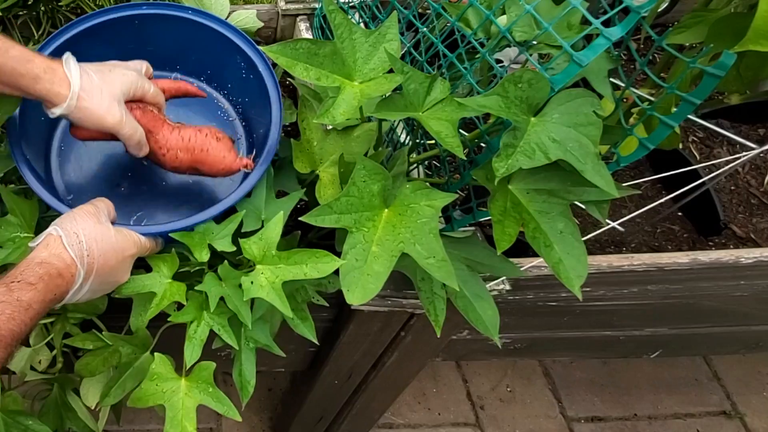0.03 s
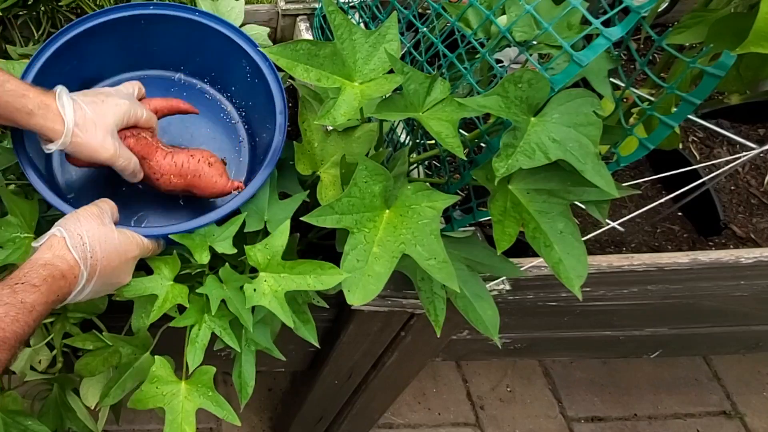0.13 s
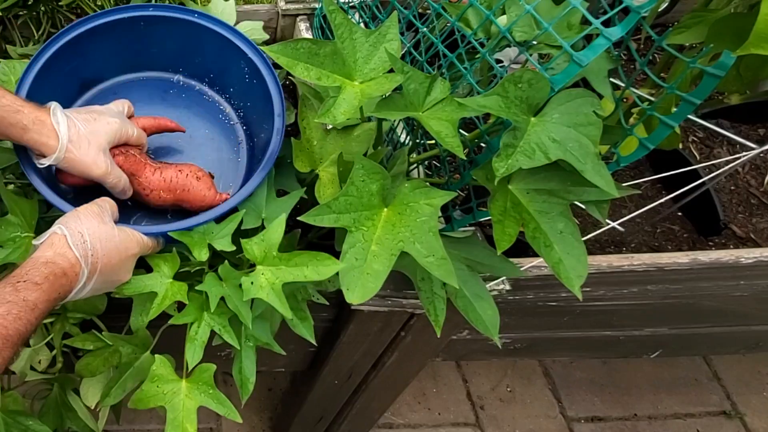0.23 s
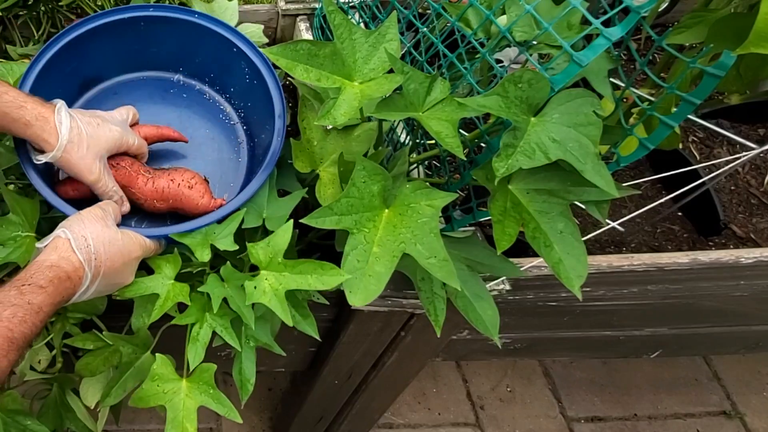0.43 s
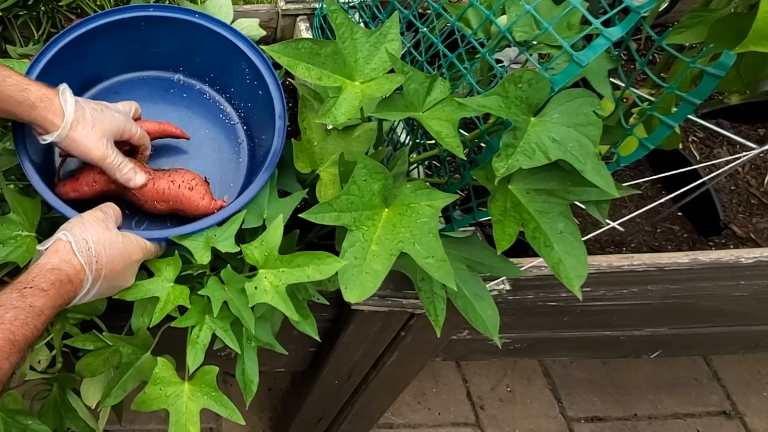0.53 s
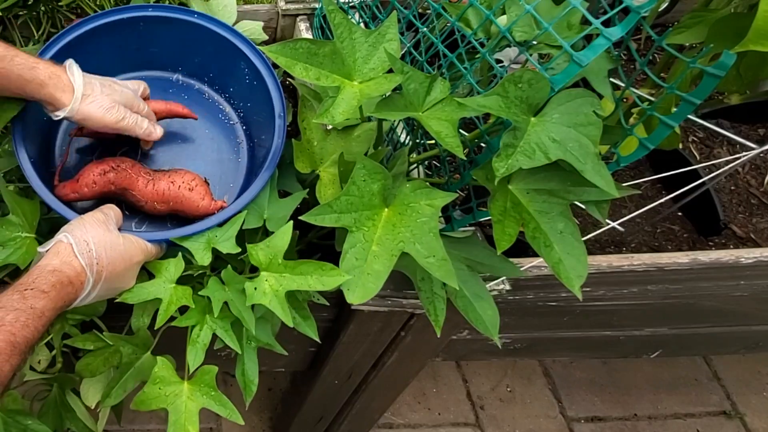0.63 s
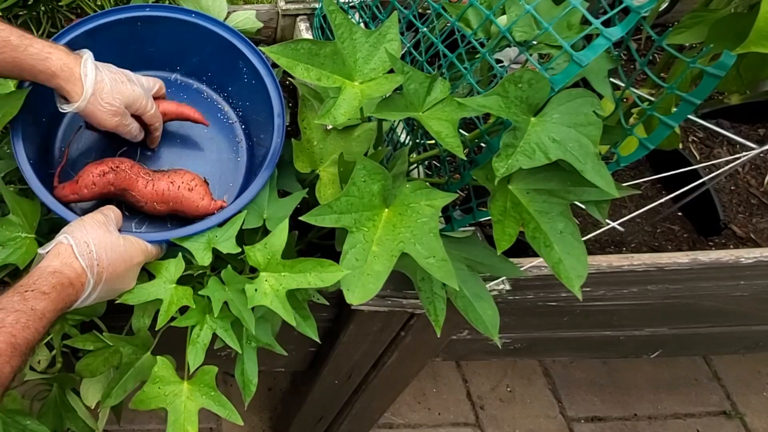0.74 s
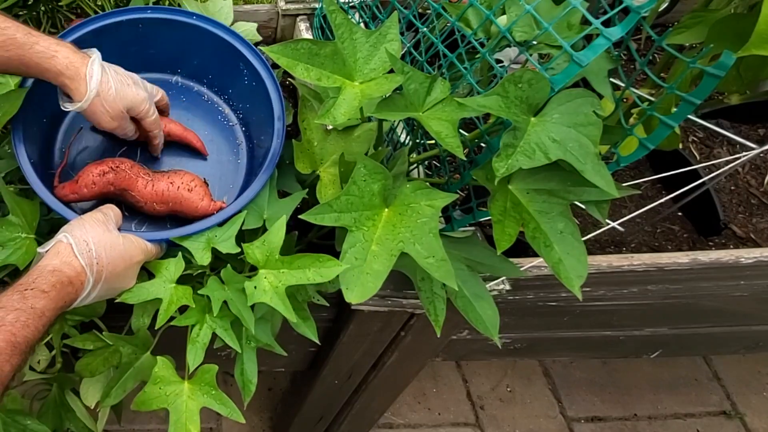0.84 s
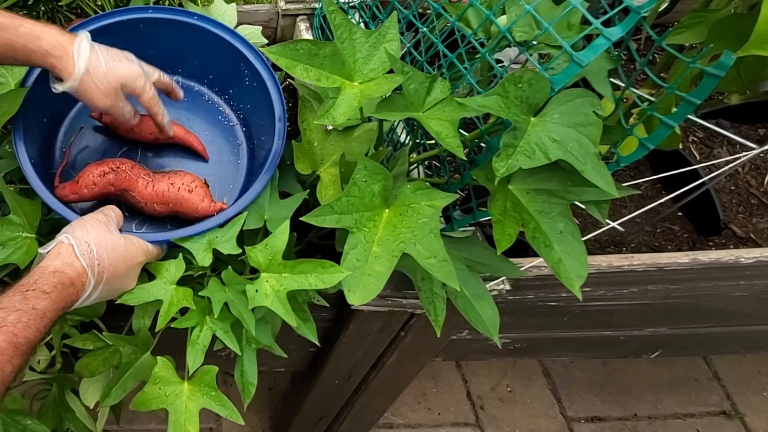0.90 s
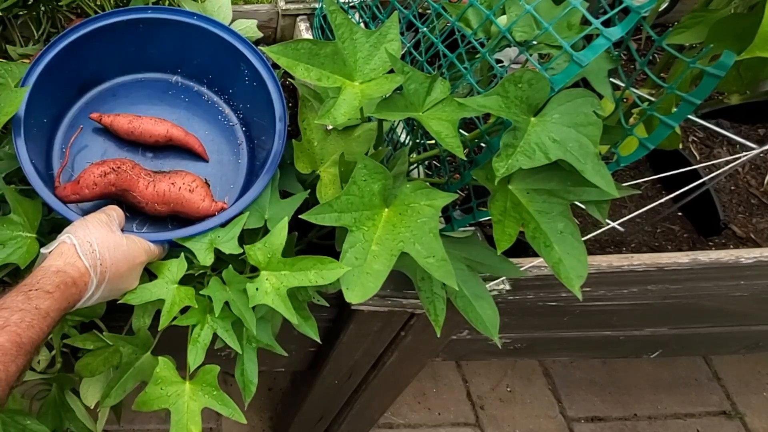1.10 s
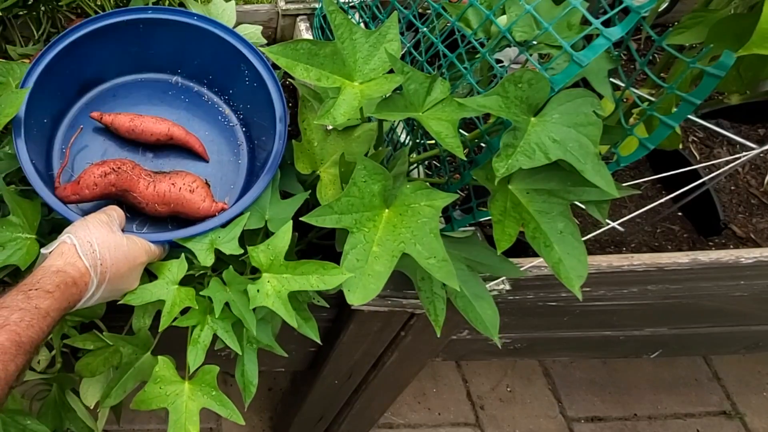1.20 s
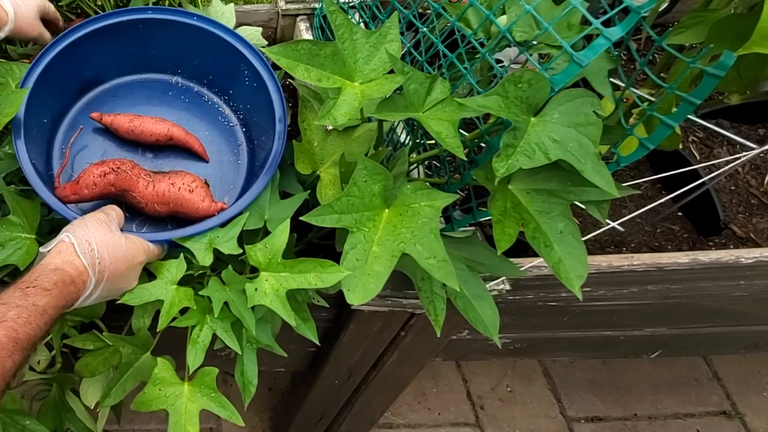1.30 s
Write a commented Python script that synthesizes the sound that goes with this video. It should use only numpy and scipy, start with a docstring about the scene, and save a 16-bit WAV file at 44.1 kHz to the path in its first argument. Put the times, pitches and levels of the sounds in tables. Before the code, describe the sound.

Two sweet potatoes knock into a plastic tub close by. After soft handling bumps, the first lands with a sharp, hollow knock at about 0.2 seconds. A glove rustles faintly around 0.6 and 0.8 seconds. The second lands near 0.8 seconds, bouncing and rocking to rest by 1 second. Soft tub thuds come and go, while insects chirp and buzz faintly on the right over quiet garden air.

```python
"""Sweet potatoes in a plastic tub

Two sweet potatoes are set down in a hand-held tub in a garden, each impact exciting its damped modes.
The big one lands with a knock; the small one is let go, bounces and rocks to rest.
The tub bumps softly in the hand, a glove rustles by friction, and insects chirp and buzz
faintly to the right over quiet outdoor air."""
import sys
import numpy as np
from scipy import signal
from scipy.fft import rfft, irfft
from scipy.io import wavfile

SR = 44100
rng = np.random.default_rng(int(sys.argv[2]) if len(sys.argv) > 2 else 0)


def dump(signal):
    """Clip the signal to [-1, 1] and save it as 16-bit WAV at the path in sys.argv[1]."""
    limited = np.clip(np.atleast_2d(signal).T, -1, 1)
    pcm = np.round(limited * 32767).astype(np.int16)
    wavfile.write(sys.argv[1], SR, pcm)


N = 59535
TIME, FREQS = np.arange(N) / SR, np.maximum(np.arange(N // 2 + 1) * SR / N, 1)


def from_db(db):
    """Amplitude grows tenfold for every 20 decibels."""
    return 10 ** (np.asarray(db) / 20)


def at_hz(points):
    """Interpolation of (Hz, value) points along a logarithmic frequency axis."""
    hz, value = np.transpose(points)
    return np.interp(np.log(FREQS), np.log(hz), value)


def pan(db):
    """Direction by level difference: two gains with a mean of one, for a pan of left minus right in dB."""
    gains = from_db(np.array([np.atleast_1d(db), -np.atleast_1d(db)]) / 2)
    return gains / gains.mean(0)


def noise(gain, coherence, pan_db=0):
    """Spectrally shaped, partly coherent stereo noise; the mean of its channels has unit rms."""
    mid, side = rng.standard_normal((2, N))
    pair = np.sqrt(1 + coherence) * mid + np.sqrt(1 - coherence) * side * np.array([[1], [-1]])
    out = irfft(rfft(pair) * gain * pan(pan_db), N)
    return out / out.mean(0).std()


def band(hz, width_hz):
    """Gaussian passband around one frequency."""
    return np.exp(-.5 * ((FREQS - hz) / width_hz) ** 2)


def decay(start, t60, rise):
    """Exponential damping, 60 dB in t60 seconds, after a smooth onset."""
    age = np.maximum(TIME - start, 0)
    onset = 1 - np.exp(-np.minimum((age / rise) ** 2, 40))
    return onset * np.exp(-np.minimum(np.log(1000) * age / t60, 40))


def swell(start, length):
    """Gaussian envelope of a short stroke."""
    return np.exp(-np.minimum(6 * ((TIME - start) / length - .5) ** 2, 40))


def ring(start, hz, db, t60, rise):
    """A struck mode vibrates freely as a damped sinusoid."""
    return from_db(db) * decay(start, t60, rise) * np.sin(2 * np.pi * hz * (TIME - start))


def air():
    """Slowly modulated noise: garden ambience, and a rumble that comes and goes as things are moved."""
    # Each row: frequency in Hz, relative spectral density in dB.
    air_spectrum = [(20, -9.5), (85, -14), (170, -12), (280, -6), (420, -6.5), (700, -3), (950, -13),
                    (1200, -25.5), (1750, -9.5), (2200, -24), (2700, -32), (3400, -19.5), (4050, -13.5),
                    (4900, -38.5), (6600, -26), (7900, -40.5), (9000, -31.5), (10500, -44.5),
                    (16000, -41.5)]
    rumble_spectrum = [(20, -15), (50, -10), (85, -2.5), (170, 1), (260, -5), (400, -25), (1200, -52)]
    # Each row: time in seconds, level in dB.
    air_levels = [(0, -70.5), (.12, -65.5), (.39, -64.5), (.56, -64), (.68, -65.5), (.87, -62.5),
                  (1.06, -64), (1.19, -60), (1.35, -58.5)]
    rumble_levels = [(0, -65), (.19, -54.5), (.34, -50), (.38, -75.5), (.53, -63), (.62, -79.5),
                     (.74, -63.5), (.96, -50.5), (1.05, -62.5), (1.17, -61), (1.35, -58.5)]
    # Each row: frequency in Hz, pan in dB.
    air_pan = [(60, -4), (380, -2.5), (700, -7), (1300, -20), (2400, -13.5), (4200, -23.5), (5600, 1.5),
               (8100, -9), (15000, -11.5)]
    garden = noise(from_db(at_hz(air_spectrum)), 0.23, at_hz(air_pan))
    rumble = noise(from_db(at_hz(rumble_spectrum)), coherence=.7)
    garden_gain = from_db(np.interp(TIME, *np.transpose(air_levels)))
    rumble_gain = from_db(np.interp(TIME, *np.transpose(rumble_levels)))
    return garden_gain * garden + rumble_gain * rumble


def insects():
    """Narrow-band noise is heard as pitch: chirps and thin, high buzzes from the leaves on the right."""
    # Each row: start in seconds, length in seconds, level in dB, centre frequency in Hz.
    chirp_calls = [(0.0, 0.07, -65.5, 4084), (0.143, 0.031, -79, 7130), (0.32, 0.032, -85.5, 8700),
                   (0.613, 0.048, -69, 8670), (0.864, 0.073, -65, 8660), (1.032, 0.038, -64.5, 3930),
                   (1.126, 0.043, -64, 8690), (1.245, 0.032, -64.5, 3526)]
    # Each row: the same four columns, then the width of the band in Hz.
    buzz_calls = [(0.55, 0.079, -52.5, 16350, 311), (0.595, 0.051, -56.5, 15600, 342),
                  (0.56, .1, -75, 14000, 1360), (0.745, .035, -58.5, 14850, 550),
                  (0.755, 0.072, -68.5, 14640, 1050), (0.825, 0.055, -64, 14660, 1100)]
    chirps = sum(from_db(db) * swell(start, length) * noise(band(hz, width_hz=110), 1.0, pan_db=-36)
                 for start, length, db, hz in chirp_calls)
    buzzes = sum(from_db(db) * swell(start, length) * noise(band(hz, width_hz), .5, pan_db=-38)
                 for start, length, db, hz, width_hz in buzz_calls)
    return chirps + buzzes


def bumps(rise_s=0.0068, scrape_db=-9):
    """Soft contact excites low frequencies: the tub thuds in the hand, each time with a dull scrape."""
    # Each row: start in seconds, level in dB, frequency in Hz, pan in dB.
    contacts = [(0.003, -43, 110, 83), (0.025, -40, 165, 6), (0.041, -35, 115, 5), (0.077, -38.5, 94.6, 1),
                (0.127, -39, 95, 8), (0.155, -28.5, 170, 24.5), (0.191, -54.5, 82, -1.5),
                (0.314, -33, 86, 2.5), (0.445, -36, 109, 3.5), (0.458, -38, 172.1, 2),
                (0.476, -48, 80.3, 20), (0.54, -52.5, 90, 5.5), (0.69, -52.5, 170, -10.5),
                (0.743, -40, 130, -4), (1.12, -46.5, 98, -6.5), (1.203, -42.5, 90, -6),
                (1.328, -53, 140, -4)]
    # Each row: frequency in Hz, relative spectral density in dB.
    scrape_spectrum = [(25, -7.5), (90, 4), (200, 2.5), (320, -14.5), (520, -19), (800, -23.5),
                       (1200, -39.5), (4000, -59)]
    out = 0
    for start, db, hz, pan_db in contacts:
        thud = ring(start, hz, db, t60=0.069, rise=rise_s)
        scrape = decay(start, t60=.12, rise=rise_s) * noise(from_db(at_hz(scrape_spectrum)), .5)
        out = out + pan(pan_db) * (thud + from_db(db + scrape_db) * scrape)
    return out


def knocks():
    """Modal superposition: each potato impact rings the tub, and its soft flesh mutes the high modes."""
    # Each row: start in seconds, gain in dB, contact time in seconds, contact cutoff in Hz,
    # bottom mode in Hz, its gain in dB, wall mode in Hz, its gain in dB, tuning factor of the shell,
    # decay-time factor of wall and shell.
    impacts = [(0.2293, 0, 0.0017, 900, 155.9, 1.5, 304.5, 5, 1.03, 0.84),
               (0.247, -11, .0032, 478.5, 180, -10, 274.3, 6.5, 0.98, 1),
               (0.7709, -0.5, .0019, 680, 157.9, 2, 287, -19, 0.95, 0.35),
               (0.8068, -28.5, 0.0021, 465, 189.4, 23.5, 263, -4, 1.06, 1.5),
               (0.8480, 2.5, 0.0057, 677, 207.4, 6, 264.7, 12.5, 1.059, 0.84),
               (0.8587, -6.5, .0013, 379.6, 203.8, 11, 318.7, 9, 1.014, 1.1),
               (0.9070, -3, 0.0045, 453, 214, 1, 277, 10.5, 1.074, 1.1),
               (0.9498, -14, 0.0037, 377, 199, -0.5, 248, 4, 1.047, 1.9),
               (0.9757, -27.5, .0028, 432, 232.4, 9, 298, 15.5, 1.34, .85)]
    # Stiffer modes of the shell. Each row: frequency in Hz, level in dB, 60 dB decay time in seconds.
    shell_modes = [(497.2, 2.7, 0.03), (516.7, 1.84, 0.045), (604.5, -6, 0.039), (1050, -17.5, 0.054),
                   (1253, -8.5, 0.021), (1900, -22, .012), (2480, -15.5, .009)]
    # Scattered ring of tub and surroundings. Each row: frequency in Hz, relative spectral density in dB.
    tail_spectrum = [(25, -9.5), (60, -7), (90, -6), (150, -9.5), (300, -1.5), (550, 9), (800, -0.5),
                     (1000, -11.5), (1250, -24), (2000, -23), (3000, -28), (8000, -60.5)]
    # Each row: frequency in Hz, pan in dB.
    tub_pan = [(150, 0.14), (320, 1.5), (560, -0.2), (800, -4), (1200, -15.5), (2500, -4.5), (5000, 0.5)]
    bottom_base_db, wall_base_db, tail_db, scatter_db = -13.5, -9.5, -24.5, 1.6
    both_in_s, contact_order = .83, 3.5
    out = 0
    for start, db, contact_s, cutoff_hz, bottom_hz, bottom_db, wall_hz, wall_db, tuning, hold in impacts:
        bottom_t60 = 0.15 if start < both_in_s else 0.1  # two potatoes damp the bottom more than one
        modes = [(bottom_hz, bottom_base_db + bottom_db, bottom_t60),
                 (wall_hz, wall_base_db + wall_db, 0.05 * hold)]
        modes += [(hz * tuning, mode_db + scatter_db * rng.normal(), t60 * hold)
                  for hz, mode_db, t60 in shell_modes]
        body = sum(ring(start, hz, mode_db, t60, contact_s)
                   / np.hypot(1, (hz / cutoff_hz) ** contact_order) for hz, mode_db, t60 in modes)
        tail_colour = from_db(at_hz(tail_spectrum)) / np.hypot(1, (FREQS / cutoff_hz) ** 2)
        tail = from_db(tail_db) * decay(start, t60=0.2, rise=0.018) * noise(tail_colour, coherence=0.92)
        out = out + from_db(db) * (tail - body)
    out = signal.sosfilt(signal.butter(1, 80, "high", fs=SR, output="sos"), out)
    return irfft(rfft(out) * pan(at_hz(tub_pan)), N)


def crack_and_scuffs(rise_s=0.00029):
    """Noise transients: a short bright burst at the peak of the first knock, and brief scuffs on later
    landings."""
    # Each row: start in seconds, level in dB, 60 dB decay time in seconds, pan in dB.
    bursts = [(0.2308, -19, 0.0071, -4.5), (0.77, -43, 0.033, -0.5), (0.8486, -35.5, 0.063, -38.5),
              (0.856, -52, 0.45, -40)]
    # Each row: frequency in Hz, relative spectral density in dB.
    burst_spectrum = [(600, -2.5), (1000, 14.5), (1400, -1.5), (1800, 10), (2400, -6), (3000, -15.5),
                      (3900, -10.5), (4500, -33.5), (6000, -11.5), (8000, -31.5), (15000, -37)]
    return sum(from_db(db) * decay(start, t60, rise_s) * noise(from_db(at_hz(burst_spectrum)), 1, pan_db)
               for start, db, t60, pan_db in bursts)


def glove(grain_db=2, grain_hz=116):
    """Sliding friction makes a grainy hiss as the hand moves from one potato to the other and lets go."""
    # Each row: start in seconds, length in seconds, level in dB.
    strokes = [(0.538, .13, -60), (0.755, 0.05, -62.5), (0.8, .13, -54.5)]
    # Each row: frequency in Hz, relative spectral density in dB.
    rub_spectrum = [(2500, -12.5), (3300, -8), (3900, 8), (4500, -8), (5000, -10.5), (5800, -9.5),
                    (7500, -30), (9000, -14.5), (11000, -21.5), (16000, -10.5)]
    # Each row: frequency in Hz, pan in dB.
    rub_pan = [(2000, -12.5), (3900, -22), (5000, -0.5), (6000, 6), (8000, 2), (15000, -34)]
    grain = from_db(grain_db * noise(band(0, grain_hz), 0.33)[0])
    rub_envelope = sum(from_db(db) * swell(start, length) for start, length, db in strokes)
    rubs = rub_envelope * noise(from_db(at_hz(rub_spectrum)), 0.26, at_hz(rub_pan))
    slide_envelope = from_db(-76.5) * swell(start=0.31, length=0.42)
    slide = slide_envelope * noise(band(2100, width_hz=270), .6, at_hz(rub_pan))
    return grain * (rubs + slide)


def scene():
    """Sound pressures add linearly: the tub close by, the garden around it."""
    return knocks() + crack_and_scuffs() + bumps() + glove() + insects() + air()


def record(dry):
    """Soft saturation rounds the loudest peaks, and a low-pass filter limits the bandwidth."""
    ceiling, stopband_hz = 0.92, 16700
    rounded = dry / (1 + (dry / ceiling) ** 8) ** (1 / 8)
    return signal.sosfilt(signal.cheby2(16, 70, stopband_hz, fs=SR, output="sos"), rounded)


dry = scene()
out = record(dry)
dump(out)
```